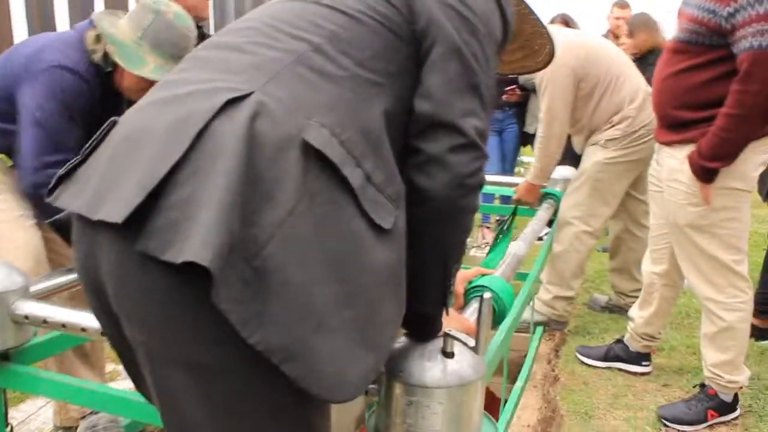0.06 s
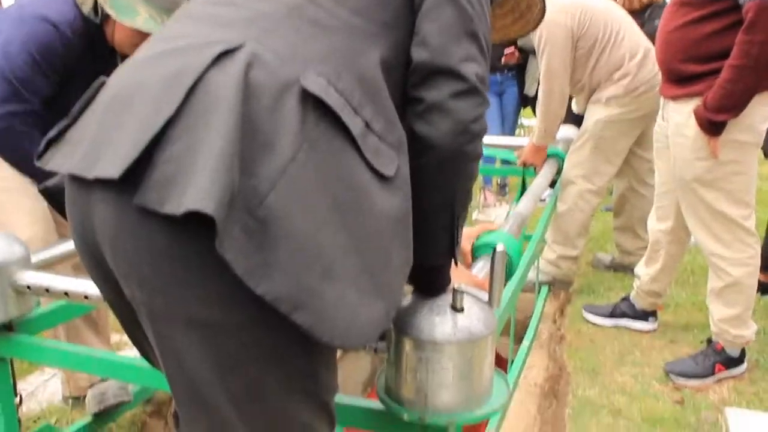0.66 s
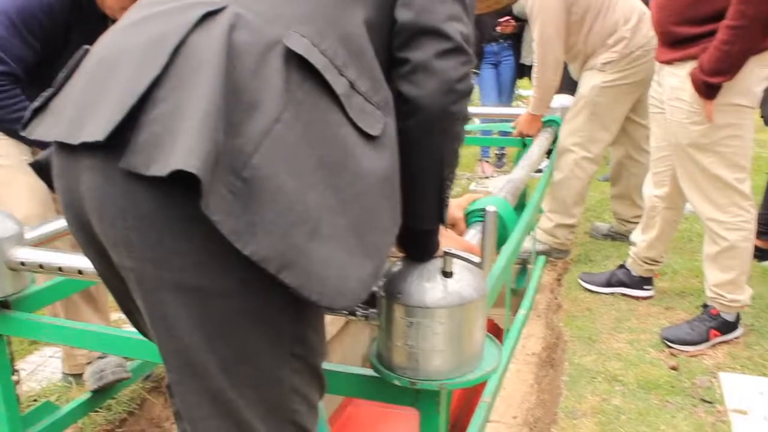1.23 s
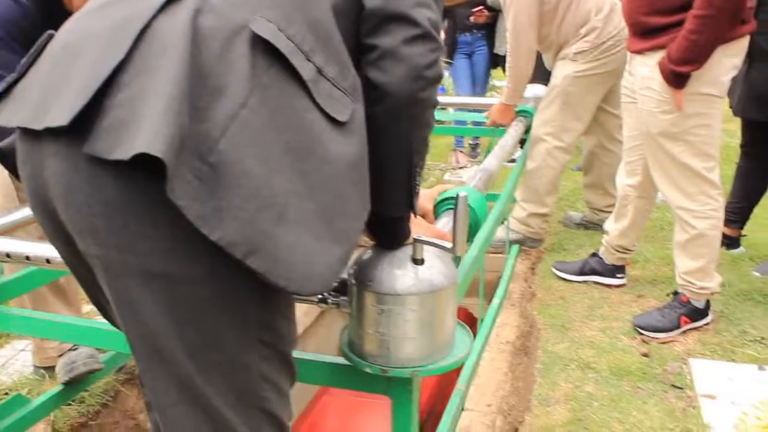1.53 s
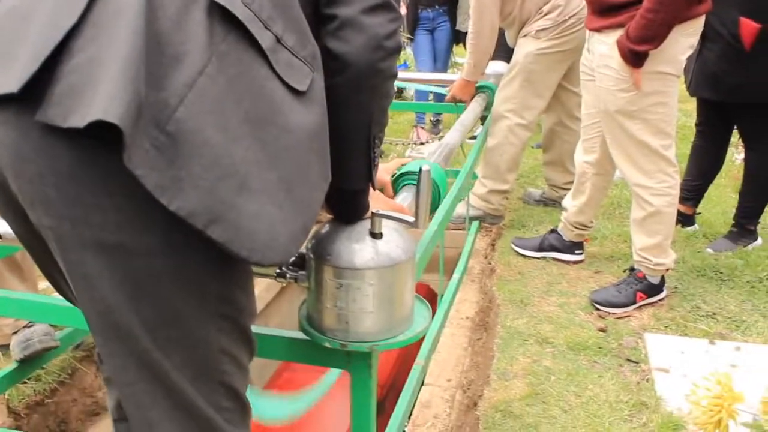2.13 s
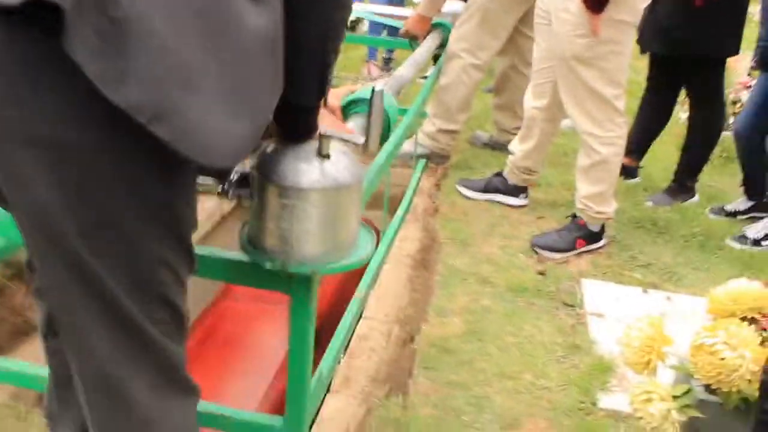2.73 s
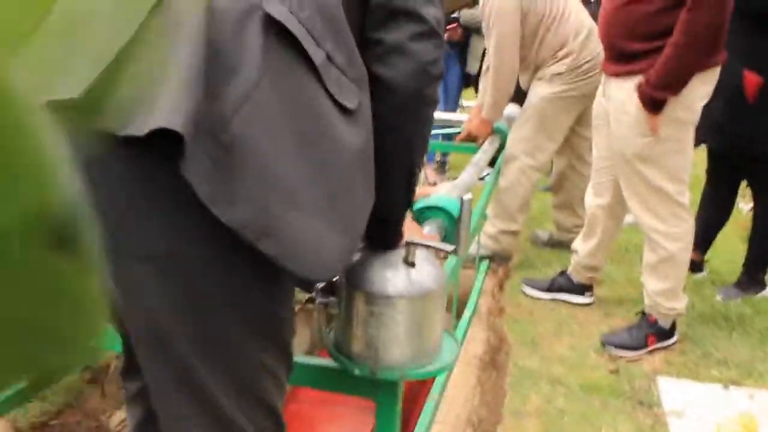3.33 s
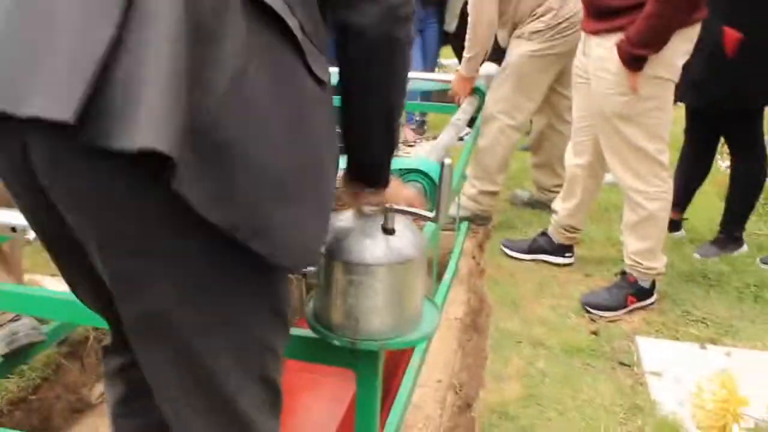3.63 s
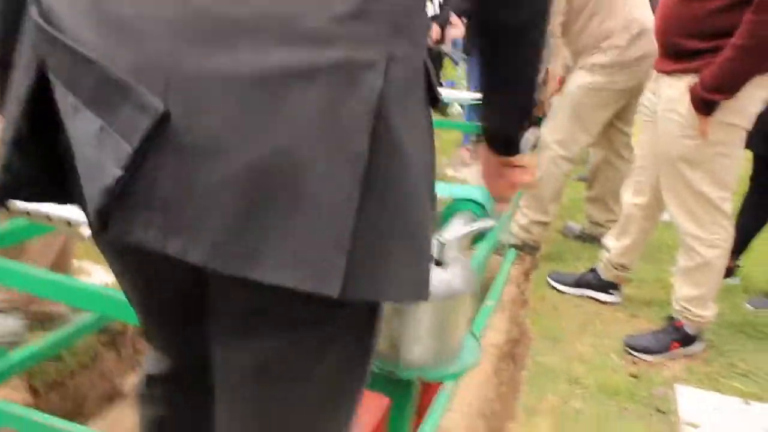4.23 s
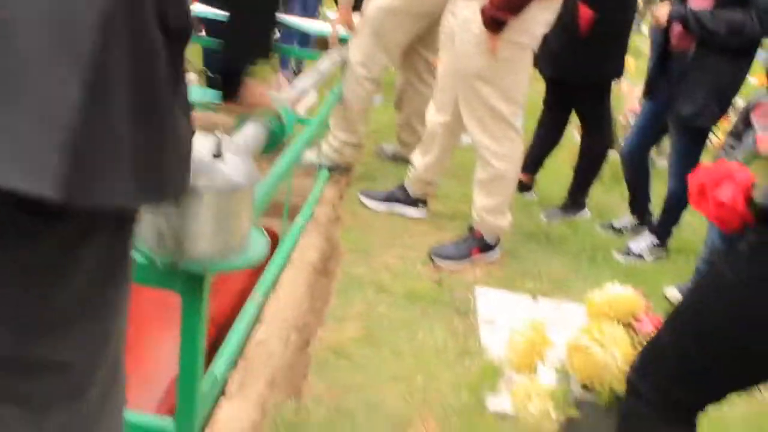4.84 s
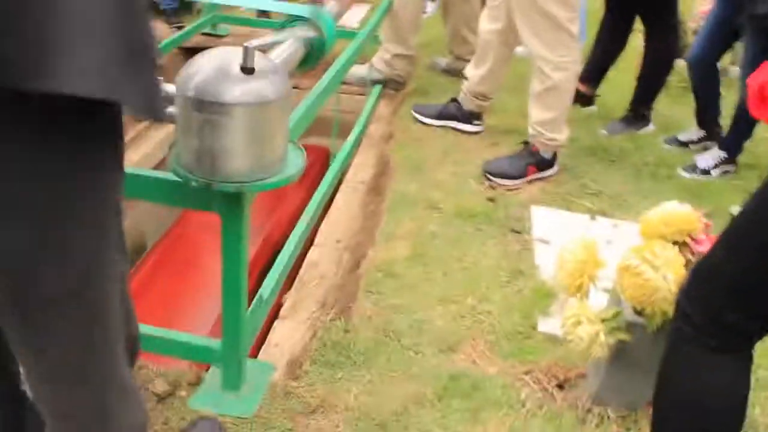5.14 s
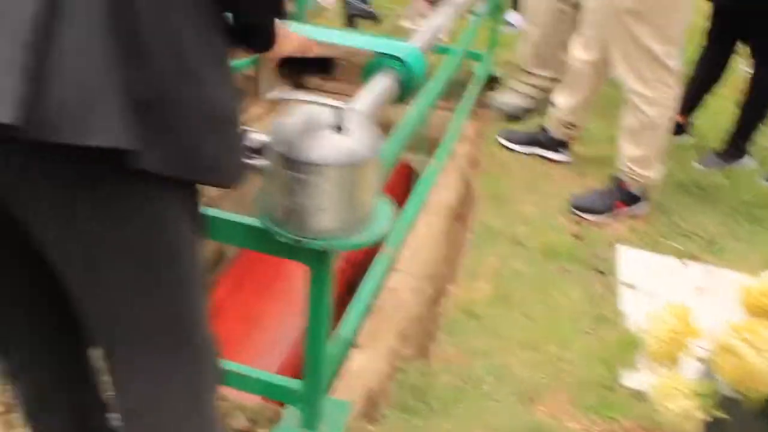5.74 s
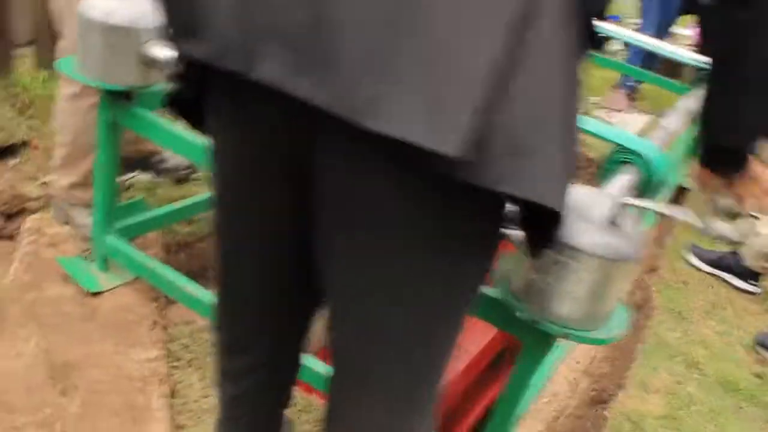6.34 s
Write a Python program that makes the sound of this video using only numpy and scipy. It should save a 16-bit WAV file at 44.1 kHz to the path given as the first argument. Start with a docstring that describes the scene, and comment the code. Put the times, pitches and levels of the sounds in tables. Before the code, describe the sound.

Metal ratchet clicks and gear scrapes come in bursts, then become steady churning and ticking, outdoors under gusts of microphone wind.

```python
"""A casket lowering device is cranked by hand on a lawn, with wind puffing on the microphone from the start.
First come seven short strokes: the gears scrape, the shaft knocks, and the pawl (a spring-loaded catch)
snaps over the teeth and rings the steel housing. From about 3.3 s the crank goes round freely, with
churning gears, a hissing strap and light ticks. It stops near 6.4 s. The wind is strongest towards
the end, and its hardest puffs overload the microphone."""
import sys
import numpy as np
from scipy import signal
from scipy.fft import rfft, irfft, next_fast_len
from scipy.io import wavfile
from scipy.ndimage import map_coordinates

SR = 44100
rng = np.random.default_rng(int(sys.argv[2]) if len(sys.argv) > 2 else 0)


def master(y):
    """Save y as 16-bit WAV."""
    cut = np.clip(np.atleast_2d(y).T, -1, 1)
    pcm = np.round(cut * 32767)  # scale
    wavfile.write(sys.argv[1], SR, pcm.astype(np.int16))


N = 290260
TIME = np.arange(N) / SR
AGE = TIME[:SR // 4]  # seconds since a hit

# The pawl drops off a tooth: start_s, level_db, hardness_db, spring_db
PAWL_DROPS = [(0.185, -3.5, -2, -18), (0.2693, -4.5, 1.5, -45), (0.3583, -10.5, -3.5, -35),
              (0.6965, -4.5, 0.5, -43), (0.7706, -8.5, -3, -44), (0.8726, -9, -6, -31),
              (1.0289, -19, 7, -43), (1.1813, -1, -5, -43), (1.2712, -10, -5, -26), (1.6308, -8, -17, -33),
              (1.706, -3.5, 0.5, -27), (1.7963, -15, -9.5, -37), (2.1763, -3, 3.5, -40),
              (2.2504, -10, -4, -46), (2.343, -11.5, -13.5, -18), (2.683, -3.5, 5.5, -42),
              (2.7606, -7, 5, -43), (2.86, -6.5, 0.5, -43), (3.2184, -3.5, 1, -37)]
# Ringing tones (fade_s is the time to fall by 60 dB): pitch_hz, level_db, fade_s
PAWL_TONES = [(4950, -5, 0.0045), (5330, 4, 0.0031), (7070, -8.5, 0.012)]
HOUSING_TONES = [(1753, -26.5, 0.081), (1950, -24, 0.18), (2270, -16, 0.04), (2790, -52, 0.039),
                 (3094, -12, 0.062), (3506, 0, 0.04), (3727, -4, 0.065), (4880, 2, 0.032),
                 (5570, -6, 0.018), (5750, -4.5, 0.1), (6700, -5.5, 0.093), (7720, -21, 0.043),
                 (8180, -25, .05), (9190, -9, 0.026), (10520, -8, 0.039), (11300, -9.5, 0.041),
                 (12500, -49, .07), (13000, -16, .055), (13150, -16, .05), (14400, -21.5, 0.037)]
# Short strokes of the crank: start_s, turn_back_s, end_s, push_db
CRANK_STROKES = [(0.171, 0.211, 0.33, -27.5), (0.621, 0.692, 0.95, -29), (1.065, 1.182, 1.31, -30),
                 (1.579, 1.623, 1.835, -27), (2.093, 2.16, 2.37, -31), (2.615, 2.684, 2.73, -26),
                 (3.145, 3.188, 3.235, -29)]
# The shaft knocks: start_s, level_db, fade_s, groan_hz
SHAFT_KNOCKS = [(1.595, -22, 0.21, 2130), (1.719, -8.5, 0.03, 1950), (1.726, -8, 0.061, 1970),
                (1.745, -15.5, 0.094, 2540), (2.102, -18, 0.092, 3700), (2.598, -18, 0.026, 3840),
                (2.6328, -14.5, 0.084, 1586), (2.7213, -1, 0.023, 2290), (3.137, -19.5, 0.044, 3220),
                (3.405, -30.5, 0.098, 3160), (3.677, -23, 0.11, 3590), (4.912, -15.5, 0.032, 2060),
                (5.917, -22, 0.02, 2300), (6.122, -15.5, 0.012, 2230), (6.31, -23, 0.0092, 1190),
                (6.544, -34, 0.09, 865)]
# Free cranking: time_s, gear_db, hiss_db
FREE_CRANKING = [(3.3, -56, -54), (3.69, -44.5, -54), (3.86, -42.5, -48), (3.99, -38.5, -56),
                 (4.14, -45, -49), (4.33, -46, -59), (4.51, -46.5, -56), (4.63, -40, -48.5),
                 (4.77, -40, -45), (4.91, -36.5, -42.5), (5.27, -44, -45.5), (5.59, -34, -42.5),
                 (5.73, -39.5, -45), (5.85, -43, -53.5), (6.33, -47, -55), (6.45, -74, -39.5)]
# The strap and bearings rub: middle_s, half_length_s, pitch_hz, level_db, width_ratio
BRIEF_RUBS = [(3.827, 0.03, 2230, -41.5, 0.061), (3.85, 0.052, 3250, -43, 0.089),
              (4.742, 0.098, 6300, -43, 0.051), (5.64, 0.043, 6280, -29.5, 0.13),
              (6.495, 0.024, 5600, -41, 0.13)]
# Loose links tick: start_s, level_db
LINK_TICKS = [(0.0992, -31.5), (0.626, -15), (0.8412, -24), (1.1173, -31), (1.1318, -39), (1.1473, -22),
              (1.1588, -25), (3.0402, -32), (3.3163, -30), (3.4388, -23), (4.792, -15.5), (4.8985, -13),
              (4.9856, -17), (5.076, -19), (5.1747, -18.5), (5.233, -9.5), (5.8912, -15.5), (6.3839, -22.5),
              (6.4618, -25.5)]
# The pawl skims a run of teeth: first_tooth_s, last_tooth_s, level_db
TOOTH_RUNS = [(3.984, 4.373, -25.5), (4.624, 4.766, -21.5), (4.969, 5.133, -20), (5.293, 5.61, -17),
              (5.718, 5.797, -16), (5.953, 6.058, -24)]
# Eddies (swirls of air) hit the microphone: time_s, level_db, pitch_hz
WIND_PUFFS = [(0.057, -4, 195), (0.099, -5, 240), (0.244, -5, 161), (0.318, -5, 320), (0.409, -7, 207),
              (0.526, -2, 230), (0.987, -10.5, 131), (1.052, -8, 109), (1.164, -7, 199), (1.321, 4, 237),
              (1.906, -3, 120), (1.942, -16, 130), (1.99, -6.5, 219), (2.061, -4, 141), (2.124, -10, 220),
              (2.388, -10, 141), (2.521, -7, 179), (2.971, -14.5, 200), (3.5, -6, 92), (4.001, -8, 159),
              (4.059, 8, 145), (4.1, -5, 220), (4.313, 2, 200), (4.578, -3.5, 122), (5.09, 3.5, 196),
              (5.23, -3, 154), (5.324, -5.5, 120), (5.384, -4.5, 130), (5.648, 0, 390), (5.66, -0.5, 340),
              (5.783, -2.5, 240), (5.834, 3.5, 199), (5.913, 7.5, 310), (6.124, 0, 166), (6.169, 4, 300),
              (6.286, -4, 160), (6.307, 4, 333), (6.365, -2, 252), (6.542, -8, 540), (6.554, -6, 400)]
# Gusts: start_s, end_s, level_db
WIND_GUSTS = [(0.07, 0.178, -23.5), (0.246, 0.425, -25.5), (0.545, 0.575, -22.5), (1.146, 1.371, -25),
              (1.547, 1.781, -26.5), (1.897, 2.09, -24.5), (2.112, 2.157, -17.5), (3.448, 3.56, -31),
              (3.974, 4.16, -29), (4.272, 4.526, -26), (5.288, 5.406, -25.5), (5.539, 5.594, -21.5),
              (5.644, 5.671, -13), (5.8, 5.944, -18), (6.04, 6.201, -19), (6.276, 6.374, -18),
              (6.504, 6.585, -20)]
# Light air between the gusts: time_s, level_db
LIGHT_BREEZE = [(0.0, -26.5), (0.58, -28), (0.81, -31), (1.01, -31), (1.17, -23.5), (1.36, -35.5),
                (2.07, -25.5), (2.82, -36), (3.19, -33.5), (4.05, -27), (4.2, -28), (4.45, -24.5),
                (4.75, -28), (5.62, -24), (5.74, -18), (6.08, -39.5), (6.58, -12.5)]
# How rich the wind is in small, fast eddies: time_s, level_db
SMALL_EDDIES = [(0, 7.5), (.55, 3.5), (1.0, -1.5), (1.3, 8.5), (1.6, -4.5), (2.1, 1), (2.6, -1.5),
                (3.5, -4.5), (4.3, -6.5), (5.1, -6), (5.6, 1), (6.0, 1.5), (6.58, 0.5)]
# How long the surroundings echo: frequency_hz, fade_s
ECHO_FADES = [(200, 0.14), (2000, 0.33), (6000, 0.04), (12000, 0.056)]

# Tone colours (spectra) of the device's noises: frequency_hz, level_db
HOUSING_COLOUR = [(150, 6), (600, -9.5), (1200, -5), (2000, -2), (3500, 0.5), (5500, 0), (7500, 2.5),
                  (9200, -1.5), (10000, -11.5), (11200, -17), (12200, -35), (13200, -30), (15000, -40),
                  (16000, -40)]
PUSH_COLOUR = [(150, -5), (450, 12.5), (900, 5.5), (1300, 7), (2200, 3.5), (3500, 3), (4200, 0), (5500, -2),
               (7800, -5.5), (9300, -17), (10500, -27), (13000, -34), (16000, -49)]
RETURN_COLOUR = [(300, -11), (1000, 3), (2200, 3.5), (3500, 2), (5500, -3), (7800, -3), (9300, -20),
                 (10500, -24), (13000, -29), (16000, -52)]
KNOCK_COLOUR = [(100, 2), (500, 4.5), (900, 0.5), (1300, 3.5), (2000, 4.5), (3500, 0.5), (6000, -1),
                (8500, -7.5), (11000, -32), (16000, -64)]
GEAR_COLOUR = [(200, 9.5), (500, 10), (1000, 10), (1600, 9), (2300, 4.5), (2800, 0.5), (3400, 4),
               (4500, -10.5), (7000, -3), (12000, -39)]
STRAP_COLOUR = [(2500, -9), (4500, -5.5), (5600, -3), (6500, 0), (7800, -6), (9000, -13), (11000, -23.5),
                (14000, -49), (16500, -42)]
FIZZ_COLOUR = [(5000, -34), (8500, -1), (11000, -14), (14500, -7), (16000, -34)]
TICK_COLOUR = [(800, 3.5), (2000, -6), (3500, 6), (5000, 2), (7500, -1.5), (10000, -19), (15000, -39)]
LOW_TICK_COLOUR = [(300, -28.5), (1000, -2.5), (1700, 4), (2600, -5.5), (4000, -16), (9000, -55)]
# Tone colours of the wind and open air: frequency_hz, level_db
RUMBLE_COLOUR = [(15, -14.5), (40, -1.5), (100, 4), (170, 1.5), (300, -4.5), (450, -13), (800, -55),
                 (2000, -79)]
FLUTTER_COLOUR = [(80, -8), (250, 2.5), (450, -1), (700, -15), (1200, -25.5), (2500, -45.5), (6000, -62),
                  (12000, -110)]
EDDY_EDGE_COLOUR = [(150, -26), (400, 9), (750, -3), (1200, -13), (2200, -27.5), (5000, -37), (12000, -100)]
AIR_COLOUR = [(20, 7), (100, -12), (300, 13), (600, 0), (1200, -2), (3000, -11.5), (7500, -18.5),
              (10000, -29), (16000, -74)]


def pawl(spring_hz=9389, overtone_hz=12850):
    """The pawl snaps onto a tooth, the ring spreads through the housing, and the spring sings."""
    out = np.zeros(N)
    onset = 1 - np.exp(-AGE / .00015)
    crack = onset * sum(tone(*row) for row in PAWL_TONES)
    for start, db, hard_db, spring_db in PAWL_DROPS:
        snap = gain(hard_db + 1.75 + .5 * db) * crack  # stronger drops put more into the crack
        body = gain(-10 - .5 * hard_db) * burst(HOUSING_COLOUR, fade_s=.061, rise_s=.00061)
        body += gain(-15) * housing_ring(db_per_octave=-3.5, scatter_db=3.5)
        low = signal.lfilter(*signal.butter(2, 8000, fs=SR), body)
        treble = gain(-3.5 - .23 * db) * (body - low)  # light drops are a little brighter
        overtone_db, detune = rng.normal(-45, 3), rng.normal(1, .012)
        spring = tone(spring_hz, spring_db, .1) + tone(overtone_hz * detune, overtone_db, .07)
        add(out, start, gain(db) * (snap + low + treble + spring))
    return out


def housing_ring(db_per_octave, scatter_db=3, rise_s=.00046, detune=.0044):
    """The steel housing rings, each hit giving its tones new strengths and slightly new pitches."""
    hz, db, fade_s = np.transpose(HOUSING_TONES)[:, :, None]
    strength, phase, shift = rng.standard_normal((3, len(HOUSING_TONES), 1))
    level_db = db + scatter_db * strength + db_per_octave * np.log2(hz / np.median(hz))
    waves = np.sin(2 * np.pi * (hz * (1 + detune * shift) * AGE + phase))
    tones = gain(level_db - 60 * AGE / fade_s) * waves
    return tones.sum(axis=0) * (1 - np.exp(-AGE / rise_s))


def gear_scrape(rise_s=.01, release_s=.017, coast_s=.078, return_db=-6.5):
    """The gears grind on each push, then slide back with a thinner sound and coast to a stop."""
    push, back = np.zeros((2, N))
    for start, turn, end, db in CRANK_STROKES:
        push_times = np.sort([start - rise_s, start + rise_s, turn, turn + release_s])
        back_times = np.sort([turn, turn + release_s, end - coast_s, end + coast_s])
        push += gain(db) * np.interp(TIME, push_times, [0, 1, 1, 0])
        back += gain(db + return_db) * np.interp(TIME, back_times, [0, 1, 1, 0])
    grind = chatter(PUSH_COLOUR, per_s=790, spread_db=6, fade_s=.032)
    slide = chatter(RETURN_COLOUR, per_s=550, spread_db=7, fade_s=.035)
    return (push * through_housing(grind, ring_db=-10, width_hz=81)
            + back * through_housing(slide, ring_db=-7, width_hz=33))


def through_housing(x, ring_db, width_hz):
    """The housing boosts rubbing noise near its own tones."""
    peaks = lambda f: sum(gain(db) / (1 + ((f - hz) / width_hz) ** 2) for hz, db, _ in HOUSING_TONES)
    return normalise(filtered(x, lambda f: 1 + gain(ring_db) * peaks(f)))


def shaft_knocks():
    """The crank shaft takes up its slack with dull knocks, each making the frame groan at one pitch."""
    out = np.zeros(N)
    for start, db, fade_s, hz in SHAFT_KNOCKS:
        groan = gain(-4.5) * burst(narrow_colour(hz, width_ratio=.02), .73 * fade_s, rise_s=.00056)
        ring = gain(-27) * housing_ring(db_per_octave=-6.5)
        thud = burst(KNOCK_COLOUR, fade_s, rise_s=.0017)
        add(out, start, gain(db - 2.5) * (thud + groan + ring))
    return out


def free_cranking(start_s=3.29, end_s=6.43, rise_s=.3, stop_s=.084):
    """The gears churn and rattle and the strap slides on its roller while the crank goes round."""
    gear_db, hiss_db = curves(FREE_CRANKING)
    turning = np.clip(np.minimum((TIME - start_s) / rise_s, (end_s - TIME) / stop_s), 0, 1)
    gears = gain(gear_db) * chatter(GEAR_COLOUR, per_s=640, spread_db=2.5, fade_s=.023)
    rattle = gain(gear_db - 4.5) * chatter(TICK_COLOUR, per_s=88, spread_db=2, fade_s=.03)
    strap = gain(hiss_db + wobble(37)) * noise(STRAP_COLOUR)
    fizz = gain(-65 + 1.6 * (hiss_db + 39)) * noise(FIZZ_COLOUR)  # faster sliding is brighter
    rubs = np.zeros(N)
    for middle, half_length, hz, db, width in BRIEF_RUBS:
        swell = np.exp(-((TIME - middle) / half_length) ** 2)
        rubs += gain(db) * swell * noise(narrow_colour(hz, width))
    return (gears + rattle + strap + fizz) * turning + rubs


def ticks(tooth_gap_s=.079, scatter_db=3):
    """Loose links tap lightly, and the pawl skims evenly spaced teeth while the crank spins."""
    out = np.zeros(N)
    teeth = []
    for first, last, db in TOOTH_RUNS:
        count = round((last - first) / tooth_gap_s) + 1
        teeth += [(start, rng.normal(db, scatter_db)) for start in np.linspace(first, last, count)]
    for start, db in list(LINK_TICKS) + teeth:
        high = burst(TICK_COLOUR, fade_s=.042, rise_s=.00016)
        low = gain(-2.5) * burst(LOW_TICK_COLOUR, fade_s=.048, rise_s=.00019)
        ring = gain(-25) * housing_ring(db_per_octave=-8.5)
        add(out, start, gain(db - 9) * (high + low + ring))
    return out


def wind_puffs(wind_db, strays_per_s=6.3, stray_hz=167, stray_octaves=.32):
    """Each passing eddy swings the air pressure; small ones swing faster and pass sooner."""
    out = np.zeros(N)
    t = AGE - .025  # seconds from the middle of a puff
    eddy_db, = curves(SMALL_EDDIES)
    strays = []  # extra eddies at random times, as strong as the wind allows
    for when, size in rng.random((round(strays_per_s * N / SR), 2)):
        hz = stray_hz * 2 ** (stray_octaves * (2 * size - 1))
        strays.append((when * N / SR, wind_db[int(when * N)] + 12, hz))
    for time_s, db, hz in list(WIND_PUFFS) + strays:
        swell = 1 / np.cosh(4 * t * hz)
        swing = np.sin(2 * np.pi * (hz * t + rng.random()))
        # fast eddies in rough air have the most ragged edge
        edge_db = -15 + 15 * np.log2(hz / 221) + .5 * np.interp(time_s, TIME, eddy_db)
        edge = gain(edge_db) * noise(EDDY_EDGE_COLOUR, size=len(t))
        add(out, time_s + t[0] + .0037, gain(db - 2.5) * swell * (swing + edge))
    return out


def wind_rumble(wind_db):
    """Wind presses unevenly on the microphone: faster air flutters more, and the tiniest eddies pop."""
    eddy_db, = curves(SMALL_EDDIES)
    gust_db = wind_db + 4.5 * np.tanh(wobble(60))
    rumble = gain(gust_db - 2 - .23 * eddy_db) * noise(RUMBLE_COLOUR)
    flutter_db = -30.5 + eddy_db + 1.24 * (gust_db + 20.5) + 4.3 * np.tanh(wobble(160))
    flutter = gain(flutter_db) * noise(FLUTTER_COLOUR)
    pop_db = -37 + eddy_db + 2.28 * (wind_db + 22.5)
    pops = gain(pop_db) * chatter(EDDY_EDGE_COLOUR, per_s=89, spread_db=7, fade_s=.011)
    return rumble + flutter + pops


def wind_strength(rise_s=.012, fall_s=.017, wake_s=.01, wake_db=-19):
    """The wind's level in dB: a breeze, the gusts, and the stirred air (wake) round each listed puff."""
    breeze_db, = curves(LIGHT_BREEZE)
    power = gain(breeze_db - 4) ** 2
    for start, end, db in WIND_GUSTS:
        fade = np.maximum(start - TIME, 0) / rise_s + np.maximum(TIME - end, 0) / fall_s
        power += gain(db) ** 2 * np.exp(-2 * np.minimum(fade, 20))
    for time_s, db, _ in WIND_PUFFS:
        fade = ((TIME - time_s) / wake_s) ** 2
        power += gain(db + wake_db) ** 2 * np.exp(-np.minimum(fade, 20))
    return 10 * np.log10(power)


def echo(x):
    """Sound scatters back, dulled, from the frame, the grave and the bystanders."""
    hz, t, bands = signal.stft(rng.standard_normal(SR // 2), SR, nperseg=256)
    fade = gain(-60 * t / value_at(ECHO_FADES, hz)[:, None])
    _, tail = signal.istft(bands * fade, SR, nperseg=256)
    return signal.fftconvolve(x, tail / np.linalg.norm(tail))[:N]


def tone(hz, db, fade_s):
    """One pure tone dying away."""
    return gain(db - 60 * AGE / fade_s) * np.sin(2 * np.pi * hz * AGE)


def burst(colour, fade_s, rise_s):
    """A hit wakes many close tones, heard as noise that rises and dies."""
    shape = gain(-60 * AGE / fade_s) * (1 - np.exp(-AGE / rise_s))
    return normalise(noise(colour, size=len(AGE)) * shape) * np.sqrt(np.mean(shape ** 2))


def chatter(colour, per_s, spread_db, fade_s):
    """Tiny random hits of uneven size, each rattling on for a moment."""
    hits = (rng.random(N) < per_s / SR) * gain(spread_db * np.clip(rng.standard_normal(N), -2, 2))
    energy = signal.fftconvolve(hits ** 2, gain(-120 * AGE / fade_s))[:N]
    return coloured(np.sqrt(np.abs(energy)) * rng.standard_normal(N), colour)


def noise(colour, size=N):
    """Steady noise with a tone colour."""
    return coloured(rng.standard_normal(size), colour)


def narrow_colour(hz, width_ratio):
    """A tone colour with one peak; its width is a share of its pitch."""
    slope = [(-12, -70), (-3, -24), (-1, -7), (0, 0), (1, -7), (3, -24), (12, -70)]
    return [(hz * np.exp(widths * width_ratio), db) for widths, db in slope]


def coloured(x, colour):
    """Give a sound a tone colour and an average level of 1."""
    return normalise(filtered(x, lambda hz: gain(value_at(colour, hz))))


def filtered(x, gain_at):
    """Turn each frequency up or down by gain_at(hz)."""
    size = next_fast_len(len(x) + 4096)
    return irfft(rfft(x, size) * gain_at(np.fft.rfftfreq(size, 1 / SR)), size)[:len(x)]


def value_at(rows, hz):
    """Read between a table's frequencies, on a log scale."""
    frequencies, values = np.transpose(rows)
    return np.interp(np.log(hz + 1), np.log(frequencies + 1), values)


def curves(rows):
    """One value per sample for each column after the time."""
    times, *columns = np.transpose(rows)
    return [np.interp(TIME, times, column) for column in columns]


def wobble(per_s):
    """A smooth curve through per_s random points a second."""
    return map_coordinates(rng.standard_normal(4096), [TIME * per_s], mode="wrap")


def gain(db):
    """Turn decibels into a multiplier."""
    return 10 ** (np.asarray(db) / 20)


def normalise(x):
    """Scale to an average (rms) level of 1."""
    return x / np.sqrt(np.mean(x ** 2) + 1e-20)


def add(track, start_s, sound):
    """Mix a sound into a track."""
    part = track[max(round(start_s * SR), 0):][:len(sound)]
    part += sound[:len(part)]


def scene():
    """The device, its faint echo, the open air and the wind, in one channel."""
    device = pawl() + shaft_knocks() + ticks() + gear_scrape() + free_cranking()
    outdoors = gain(-16.5) * echo(device) + gain(-45.5) * noise(AIR_COLOUR)
    wind_db = wind_strength()
    return (device + outdoors + wind_rumble(wind_db) + wind_puffs(wind_db))[None]


def record(dry, top_hz=16500):
    """The microphone overloads, flattening the loudest peaks; nothing above top_hz is kept."""
    flattened = dry[0] / (1 + np.abs(dry[0]) ** 6) ** (1 / 6)
    return filtered(flattened, lambda hz: hz < top_hz)[None]


dry = scene()
out = record(dry)
master(out)
```